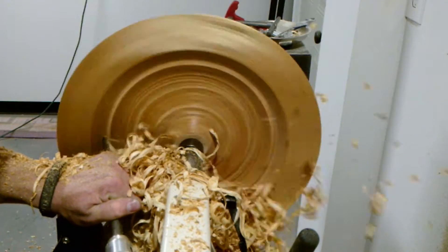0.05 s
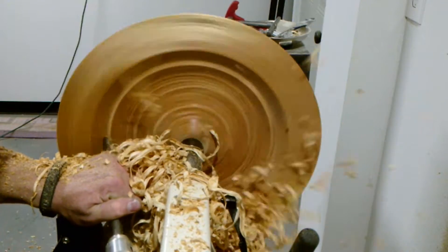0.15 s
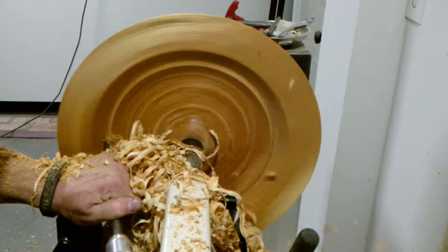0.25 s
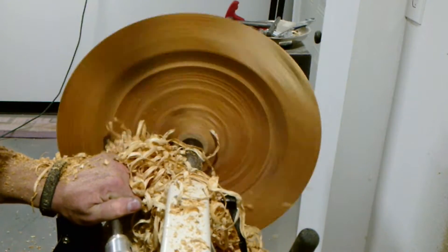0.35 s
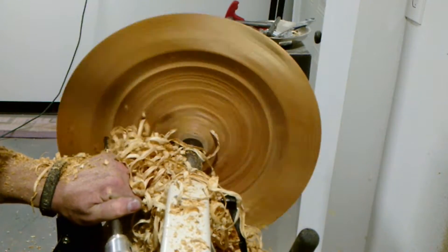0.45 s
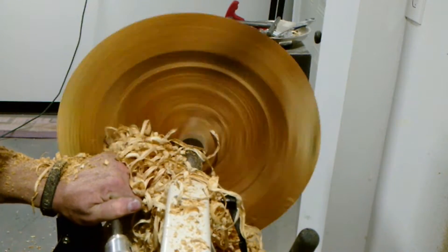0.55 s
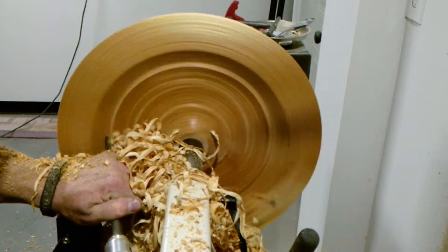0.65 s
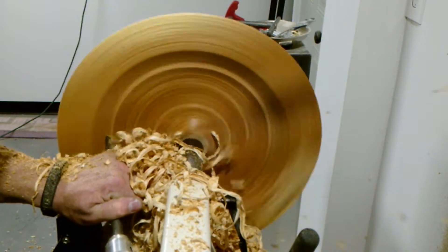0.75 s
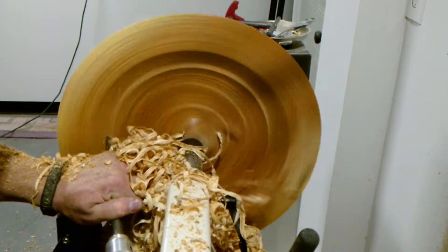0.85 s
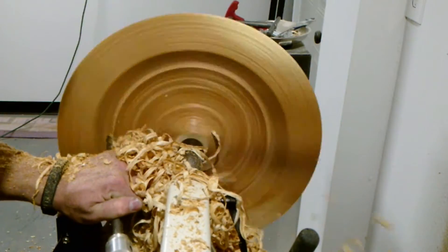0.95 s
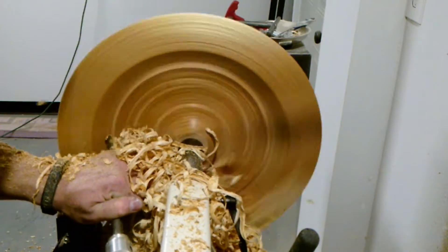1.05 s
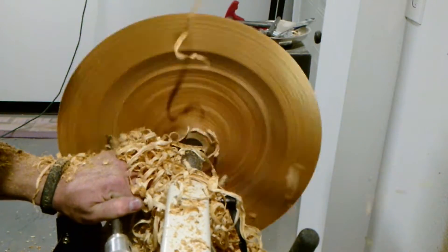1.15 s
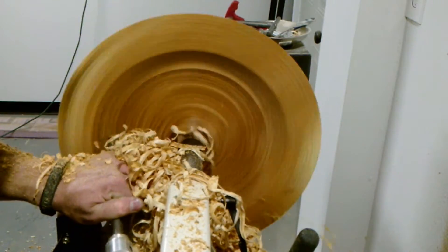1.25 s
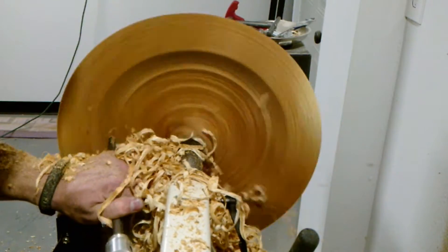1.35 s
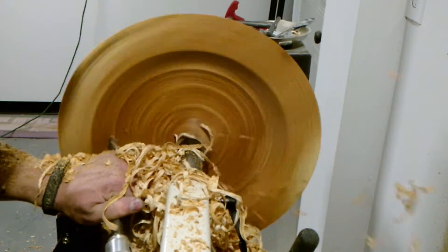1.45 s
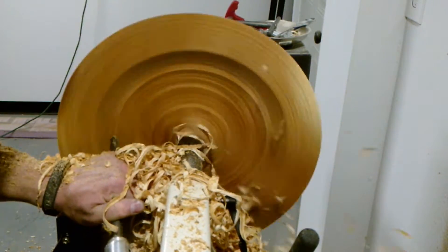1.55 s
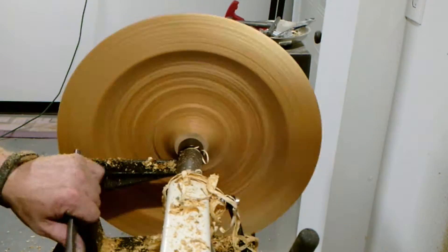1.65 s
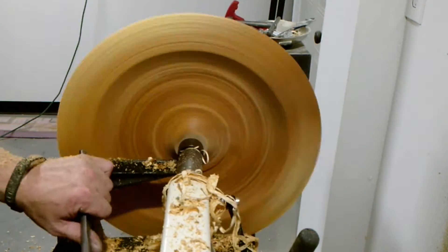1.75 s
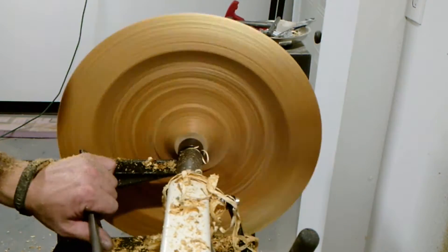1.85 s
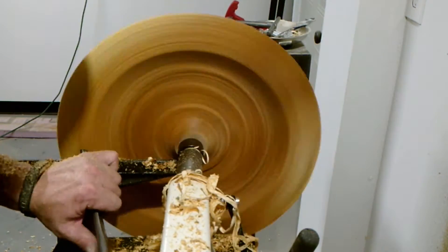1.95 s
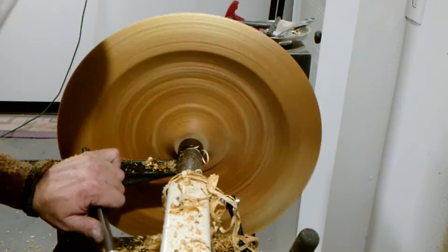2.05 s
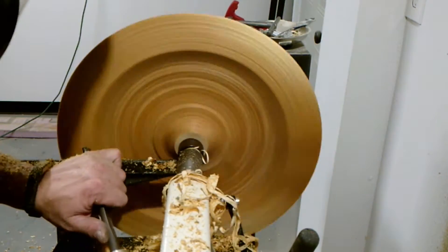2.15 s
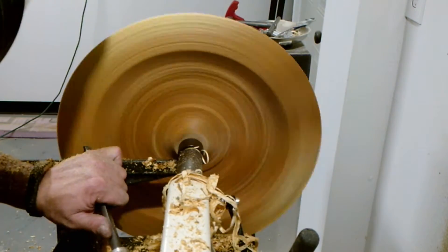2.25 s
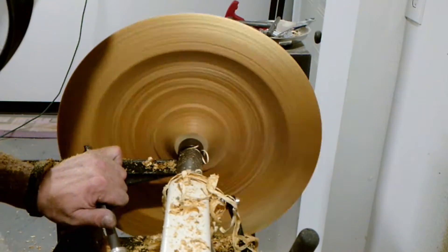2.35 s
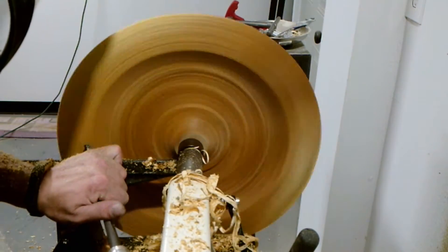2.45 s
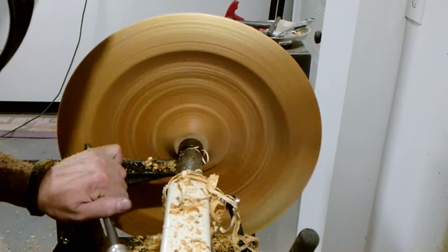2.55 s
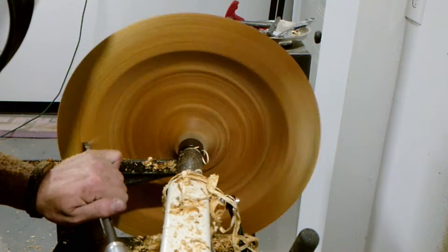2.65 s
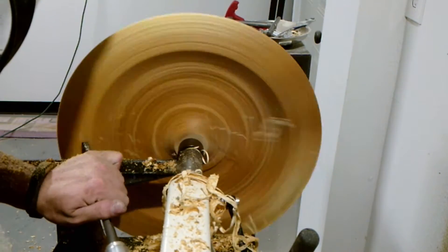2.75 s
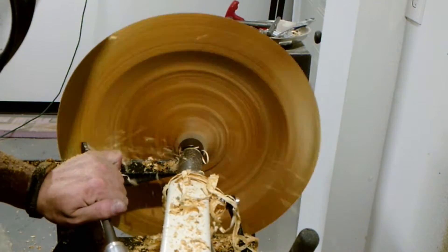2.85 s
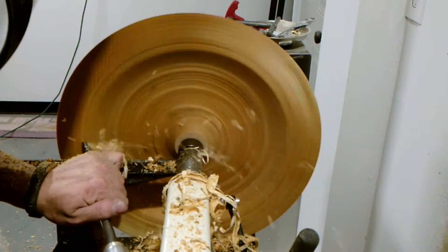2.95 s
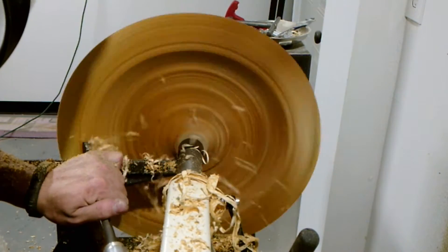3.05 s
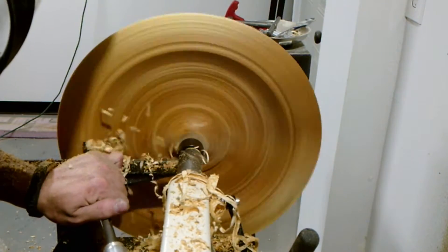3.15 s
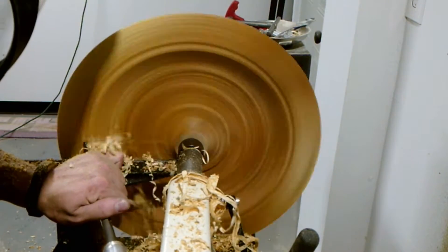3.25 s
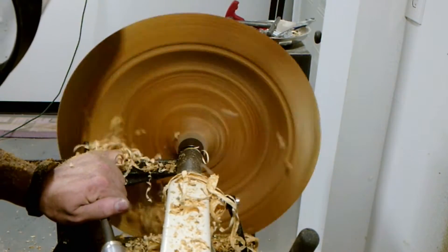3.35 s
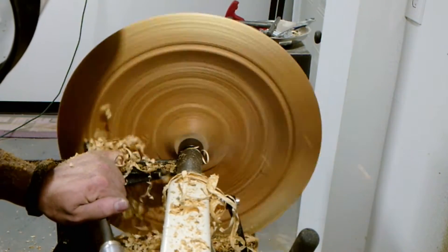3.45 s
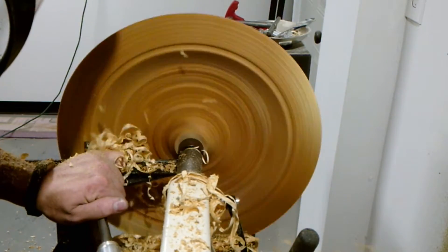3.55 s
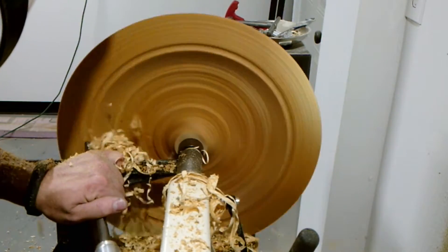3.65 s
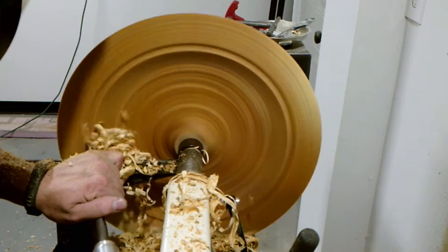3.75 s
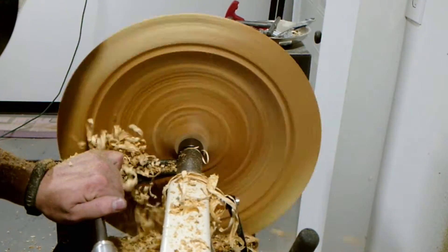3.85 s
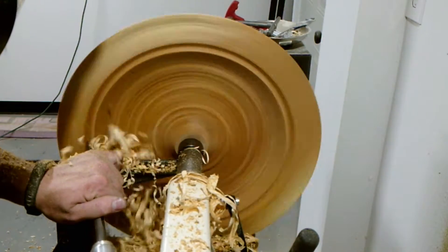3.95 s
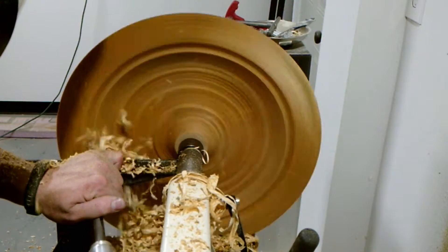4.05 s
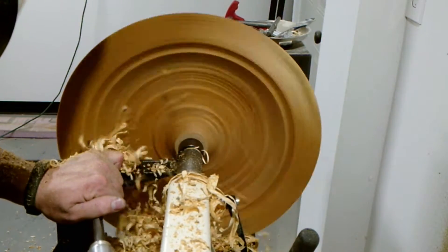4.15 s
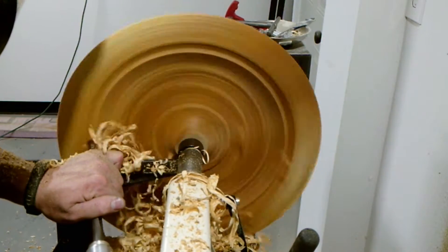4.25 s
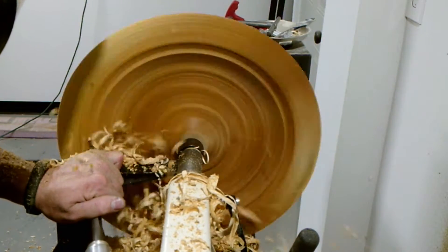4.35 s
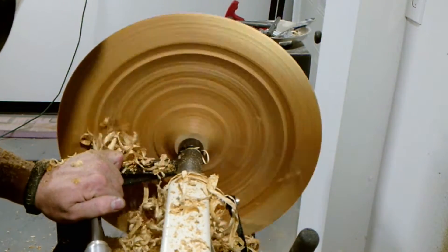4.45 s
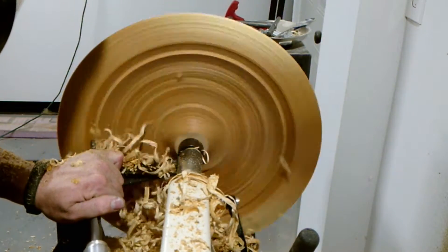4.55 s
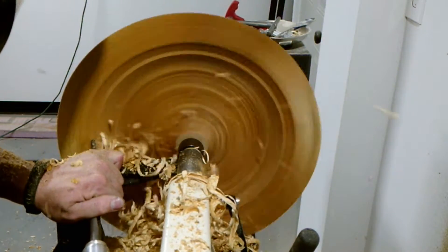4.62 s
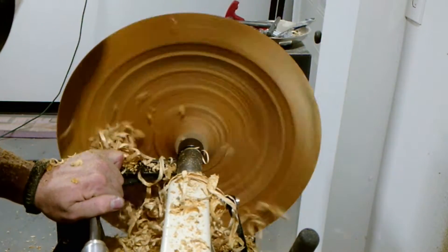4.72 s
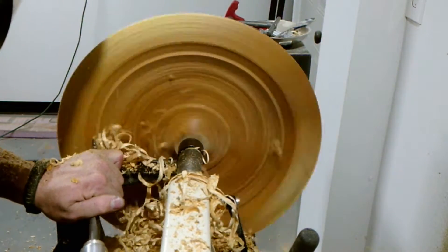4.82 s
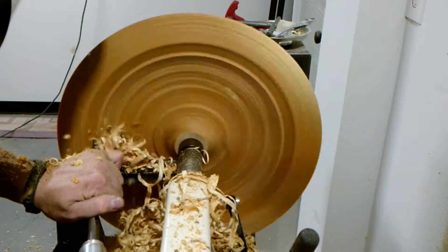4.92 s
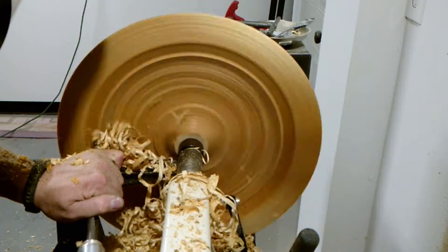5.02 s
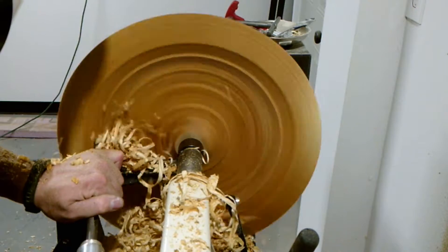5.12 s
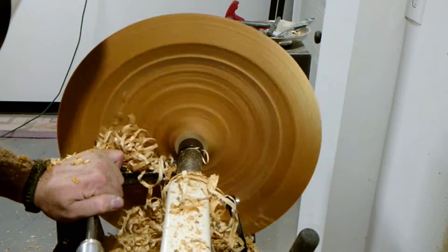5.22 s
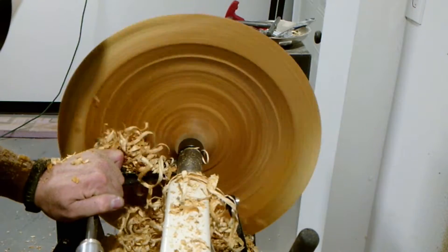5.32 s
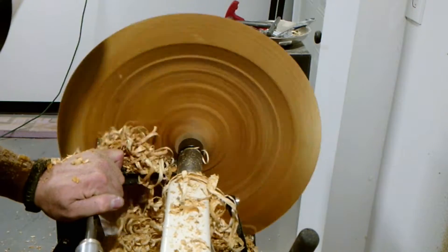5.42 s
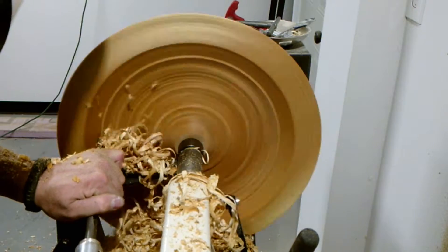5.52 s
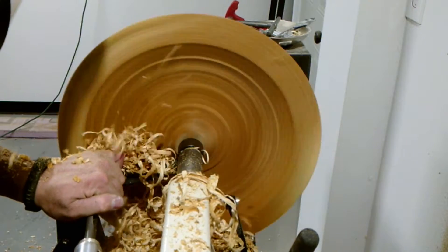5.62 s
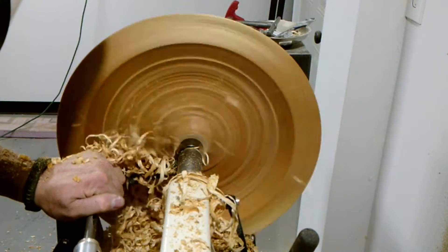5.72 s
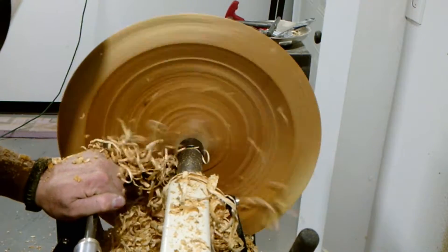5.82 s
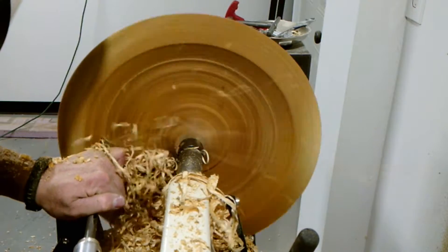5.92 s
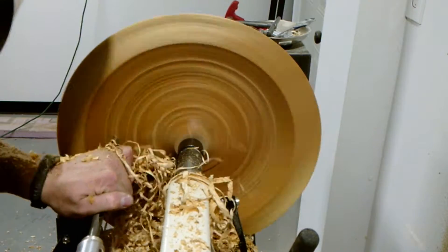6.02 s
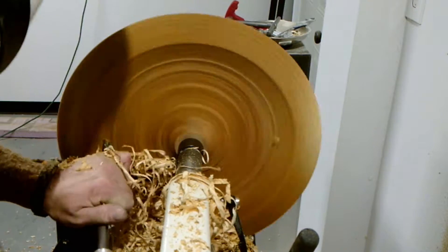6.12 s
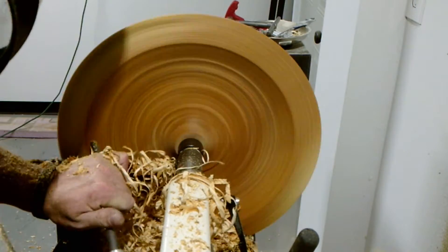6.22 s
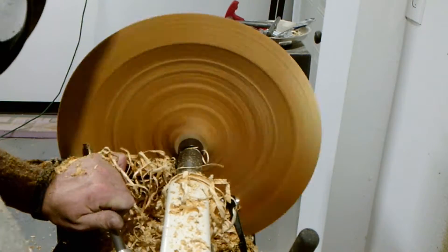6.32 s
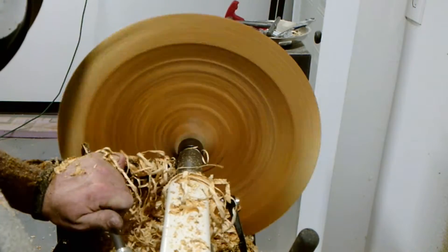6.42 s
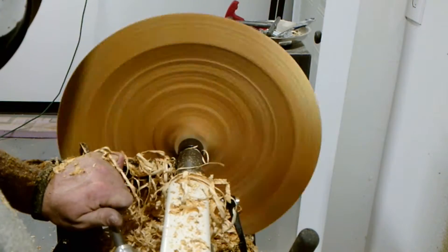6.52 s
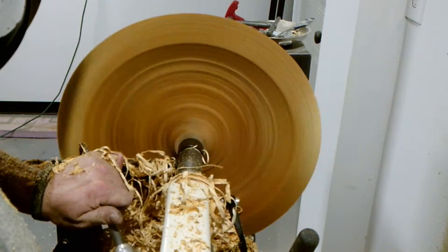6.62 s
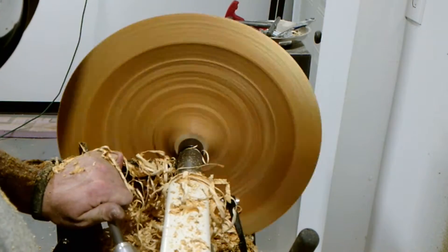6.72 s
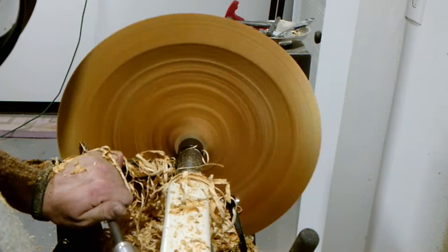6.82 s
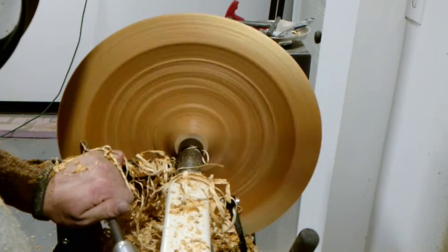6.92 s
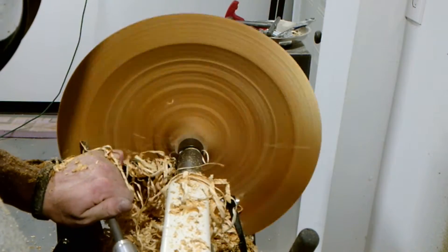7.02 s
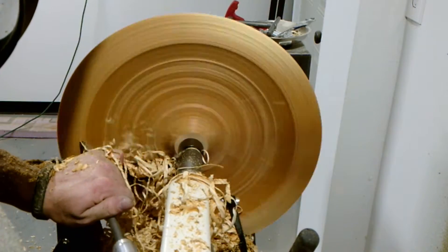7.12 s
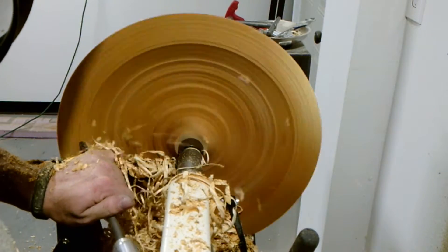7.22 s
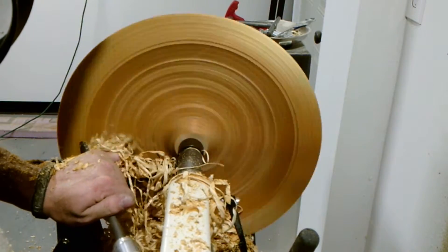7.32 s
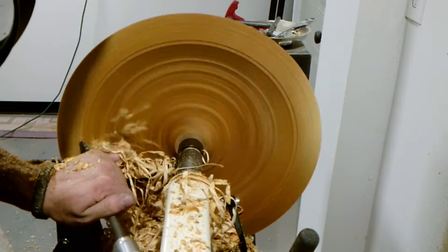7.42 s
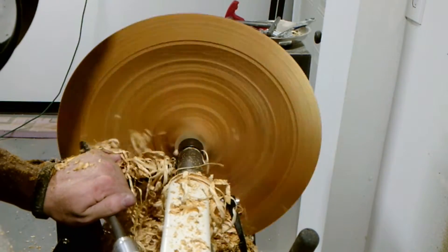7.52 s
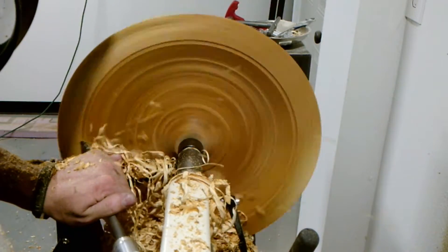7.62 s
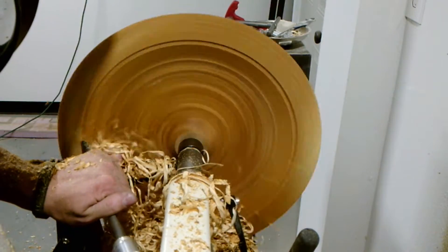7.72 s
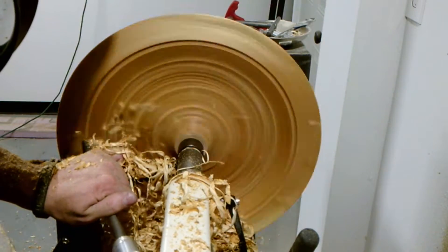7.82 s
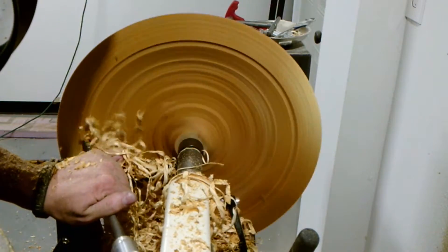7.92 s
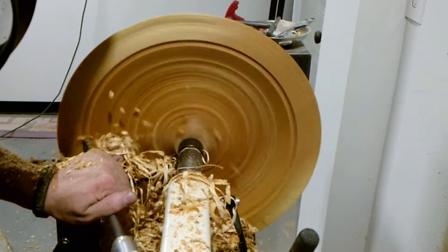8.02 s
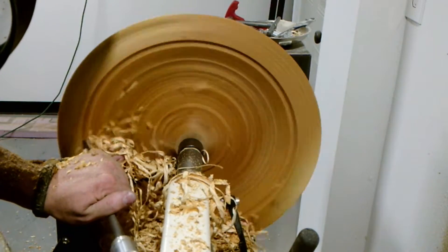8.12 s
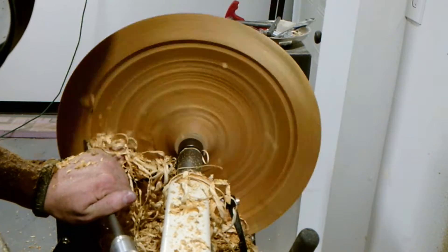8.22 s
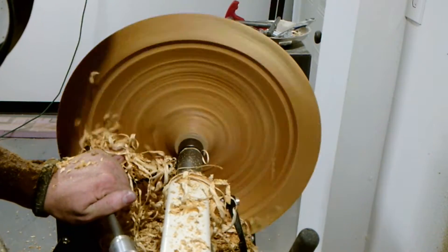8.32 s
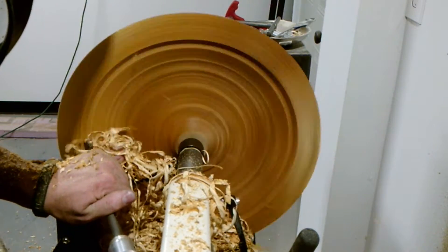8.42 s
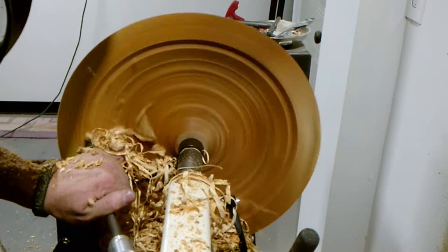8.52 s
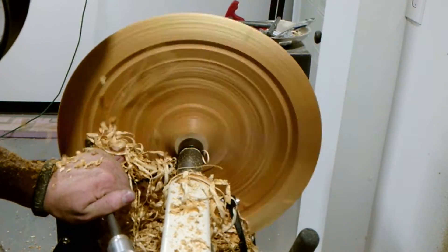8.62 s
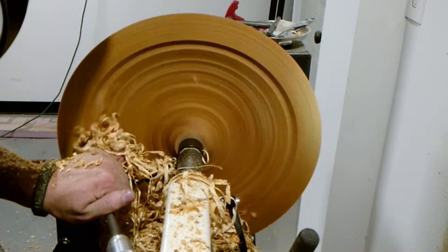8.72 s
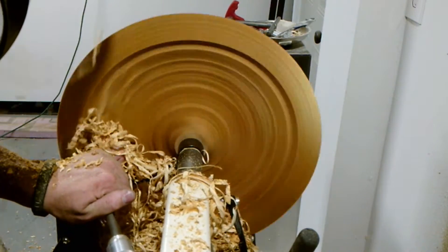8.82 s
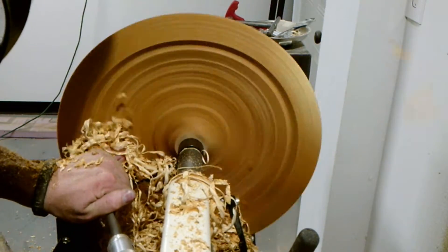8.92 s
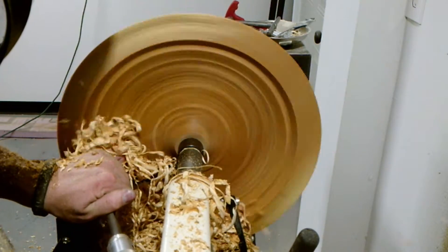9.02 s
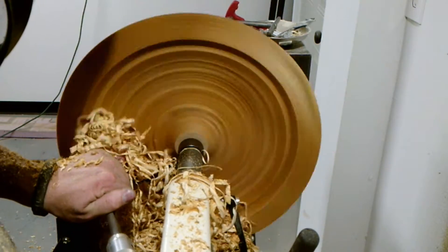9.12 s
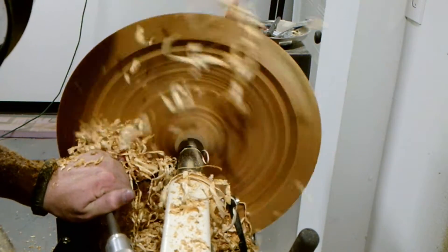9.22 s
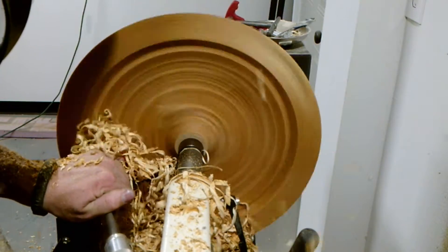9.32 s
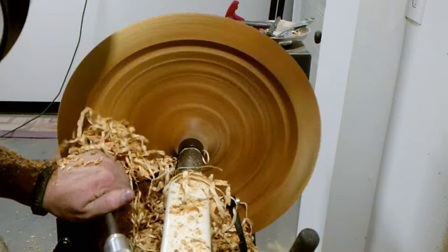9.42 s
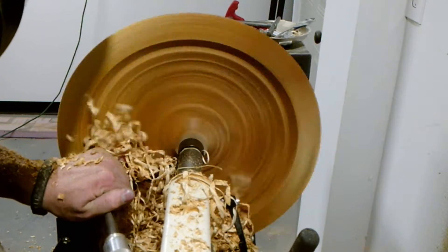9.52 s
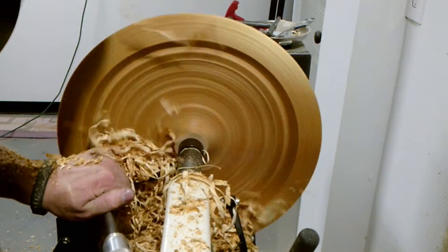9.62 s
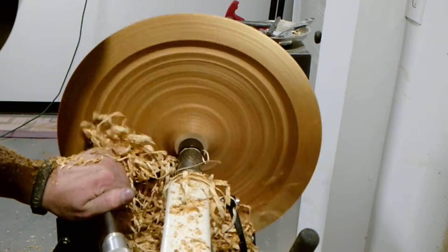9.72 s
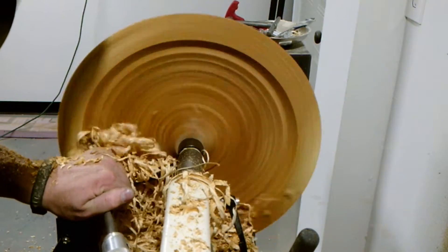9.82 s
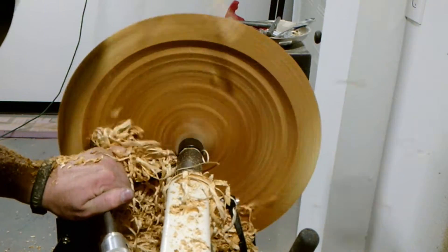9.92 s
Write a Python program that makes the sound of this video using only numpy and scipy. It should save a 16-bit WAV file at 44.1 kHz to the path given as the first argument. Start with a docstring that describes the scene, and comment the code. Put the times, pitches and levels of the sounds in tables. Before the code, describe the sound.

Close in a small workshop, a gouge tears shavings from a spinning wooden blank. Harsh, bright, metallic scraping flutters very fast with the grain and carries a thin wavering high ring. It stops, shavings rustle over the idling motor whine, a second longer pass builds and ends with a sharp tap, then after a short pause a third pass continues to the end.

```python
"""A small workshop: close by, a gouge shears shavings from a wooden bowl blank on a lathe, in three passes.
Noise from tearing fibres rings the steel tool and its rest, biting harder twice a turn on end grain, while the
edge sings as a wavering sine. Harmonics of the motor shaft whine and sag under load; filtered noise makes the
shop, a hiss and brushed shavings. A hard spot in the wood knocks once a turn in two passages; a low hum swells."""
import sys
import numpy as np
from scipy import signal
from scipy.fft import rfft, irfft
from scipy.io import wavfile
from scipy.ndimage import uniform_filter1d, map_coordinates

SR = 44100
rng = np.random.default_rng(int(sys.argv[2]) if len(sys.argv) > 2 else 0)


def transcribe(signal):
    """Save signal, clipped to [-1, 1], as a 16-bit WAV file at the path in sys.argv[1]."""
    frames = np.atleast_2d(signal).T
    limited = np.clip(frames, -1, 1)
    pcm = np.round(limited * 32767).astype(np.int16)
    wavfile.write(sys.argv[1], SR, pcm)


N = 439672

# speed of the motor shaft: (time_s, turns_per_s)
MOTOR_SPEED = [(0, 48.6), (.8, 48.8), (1.3, 49.3), (1.55, 50.5), (2.85, 50.5), (3.15, 49.6), (3.5, 48.5),
               (3.8, 47.8), (4.4, 48.3), (5.5, 49.3), (5.9, 49.8), (6.08, 50.5), (7, 50.5), (7.3, 49.6),
               (7.9, 48.4), (8.5, 48.2), (9.2, 48), (9.97, 47.7)]


def undb(db):
    """Decibels to amplitude gain."""
    return 10 ** (np.asarray(db) / 20)


def curve(rows, **ends):
    """Columns of a table after its time column, drawn as lines with one value a sample."""
    s, *columns = np.transpose(rows)
    return [np.interp(np.arange(N) / SR, s, column, **ends) for column in columns]


def unit(x):
    """Scale to an rms of 1."""
    return x / np.sqrt(np.mean(x ** 2))


def ring(x, hz, width):
    """One resonance, gain 1 at the centre; width in Hz."""
    return signal.lfilter(*signal.iirpeak(hz, hz / width, fs=SR), x)


def walk(rate):
    """Random levels held 1 / rate s and slewed twice; spread near 1."""
    hold = int(SR / rate)
    steps = np.repeat(rng.standard_normal(N // hold + 1), hold)
    return 1.24 * uniform_filter1d(uniform_filter1d(steps, hold), hold)[:N]


def swell(start, end, db, rise_db, fall_db):
    """Gain that rises to a level, holds it and falls, in dB a second."""
    t = np.arange(N) / SR
    return undb(db - rise_db * np.maximum(start - t, 0) - fall_db * np.maximum(t - end, 0))


def level_power(x):
    """Divide a gain by its own rms over a sliding quarter second, so it shares out effort and adds none."""
    return x / np.sqrt(uniform_filter1d(x ** 2, size=SR // 4))


def grip():
    """Which pass is under way, 0 to 2; the hands take a new grip in the pauses."""
    regrip_s = [2.2, 6.5]  # times of the new grips: (time_s)
    return np.searchsorted(regrip_s, np.arange(N) / SR)


def cut():
    """Effort as gain, then in dB: how light the cut is, grain bite, treble lift and the bias to one half."""
    # the hand on the tool, one list a pass; treble lifts as the tool rolls over, the two bites are shaped in grain():
    # (time_s, effort_db, end_grain_bite_db, treble_lift_db, one_half_bite_db)
    passes = [
        [(0, -20, 2.5, 2, -1), (.5, -20.5, 3.5, .5, -1), (.9, -19, 3.5, 0, -0.5), (1.15, -20, 4, -1.5, -1),
         (1.3, -21, 5, -0.5, -2), (1.4, -22, 5, -3, -1.5), (1.47, -29, 5, -3, -1.5), (1.6, -57, 8, 0, -1)],
        [(2.69, -61, 2, 0, 1), (2.72, -41, 2, -2, 3), (2.78, -39, 2.5, -2, 2), (2.85, -30, 2, 0, 1),
         (3, -26.5, 1.5, 1, 3.5), (3.15, -24.5, 1.5, 1.5, 3.5), (3.4, -21.5, 1.5, 4.5, 1.5),
         (4, -19.5, 2.5, 6, -0.5), (4.5, -19, 2, 2, -1), (4.95, -17.5, 2.5, -2.5, -0.5), (5.4, -20, 2, -4, -1),
         (5.955, -19, 2.5, -5, -1), (5.99, -30, 2.5, -6, -0.5), (6.08, -64, 0, -6, 1)],
        [(6.97, -57, 1, 0, 1.5), (7.05, -29, 2, -1, 3), (7.13, -26.5, 2, 1.5, 2), (7.25, -24.5, 2.5, 1.5, 3),
         (7.5, -19.5, 3, 2, 1.5), (7.9, -18, 3, 2, -1), (8.4, -17, 3, -1, -1), (8.8, -18.5, 3.5, -0.5, -1.5),
         (9.4, -20, 2.5, -1, -0.5), (9.97, -19.5, 3, -2.5, -1)],
    ]
    full_cut_db, light_span_db = -19, 12  # a cut counts as lighter below this effort, by at most this span
    effort = sum(undb(curve(rows, left=-150., right=-150.)[0]) for rows in passes)
    effort_db, *controls = curve(np.vstack(passes))
    return effort, np.clip(full_cut_db - effort_db, 0, light_span_db), *controls


def turns():
    """Angle of the blank against the edge, counted in turns; the belt ties it to the motor."""
    # where the edge stands against the grain, one row a pass: (time_s, blank_angle_turns)
    setting = [(.75, .58), (4.5, .18), (8.5, .775)]
    belt_ratio = 2.524  # turns of the motor to one turn of the blank
    spun = np.cumsum(curve(MOTOR_SPEED)[0]) / SR / belt_ratio
    offset = np.array([angle - spun[int(s * SR)] for s, angle in setting])
    return spun + offset[grip()]


def grain():
    """Bite of the edge in dB: it catches on meeting end grain, twice a turn, then eases;
    one half of the turn bites harder, and which half changes with the cut."""
    half_offset_turns = .5
    _, _, bite_db, _, round_db = cut()
    turn = turns()
    side = 2 * np.pi * (turn - half_offset_turns) + 0.24
    half = 4 * np.pi * turn + 0.71
    catch = uniform_filter1d(np.exp(-((2 * turn - .75) % 1) / 0.1), size=70)
    twice_a_turn = np.cos(half) + 0.36 * np.cos(2 * half + 2.22) + .95 * catch
    once_a_turn = np.cos(side) + 0.26 * np.cos(2 * side + .8) + 0.16 * np.cos(3 * side + 1.4)
    return 1.36 * (bite_db * twice_a_turn + round_db * once_a_turn)


def touches():
    """Short scrapes with a sudden start as tool and rest meet or part: gains for low, middle and high ranges."""
    # the tool touches, leaves or taps the rest:
    # (time_s, peak_db, decay_to_minus_60_db_s, low_range_lift_db, high_range_lift_db)
    contacts = [(2.696, -32, .03, -1, 2), (2.702, -24, 0.04, -1, 2), (2.832, -33, .05, -1, 1),
                (5.998, -12, 0.045, -5, -9), (6.0494, -37, 0.1, 10, -4), (6.348, -37, .07, 10, 0.5),
                (6.977, -34, .03, -6, 6), (6.985, -30, 0.08, -6, 6)]
    out, t = np.zeros((3, N)), np.arange(N) / SR
    for s, db, t60, low_db, high_db in contacts:
        fade_s = np.where(t < s, .004, t60)
        envelope = undb(db - 60 * np.abs(t - s) / fade_s)
        out += undb([[low_db], [0], [high_db]]) * envelope
    return out


def chatter(bite_db):
    """The flute of the gouge drives itself into song while the edge is biting; its pitch wavers a little."""
    song_hz = 4247
    gate = level_power(undb(2.43 * uniform_filter1d(bite_db, size=130) + 1.5 * walk(11)))
    phase = 2 * np.pi * np.cumsum(song_hz + 32 * walk(90)) / SR
    return np.sqrt(2) * gate * np.sin(phase)


def gouge():
    """Dense fibre breaks of uneven size excite every ring of the tool, its rest and the blank."""
    # resonances of tool, rest and blank, one list for each range, main range first; levels are a balance
    # within the range: (centre_hz, width_hz, pass_1_db, pass_2_db, pass_3_db)
    ring_bank = [
        [(3498, 60, -6, -11, -11), (3634, 47, -10, -10, -10), (3865, 30, -3, -30, -18),
         (4204, 35, -4, -18, -9.5), (4246, 25, 0, 0.5, -0.5), (4400, 87, -20, -11.5, -18.5),
         (4860, 40, -25, -26, -27), (4953, 36, -7, -8, -9.5), (5220, 67, -24, -12.5, -13),
         (5524, 115, -28, -17, -14), (4040, 1880, -11, -12.5, -14.5)],
        [(487.5, 20, 0, 2, 0), (618, 490, 0, -7, 0)],
        [(986, 56, 2, 4, -2), (1070.5, 21, -2, 1, 3.5), (1118, 340, -5, -4, -3)],
        [(1775, 136, -6, -15.5, -28), (1903.5, 32, -3.5, 0, -1), (2026, 36, -7, -6.5, -5.5),
         (2242, 67, -18, -4.5, -4), (2332, 120, -24, -5, -7), (2556, 30, -15, -1.5, 0.5),
         (2728, 29, 1.5, 0.5, -2), (2206, 1360, -13, -6.5, -7.5)],
        [(6460, 50, 0, -1, -25), (6545, 80, -2, -26, -31), (6620, 33, -22, -9, -5), (6766, 48, -7, 2.5, 0.5),
         (6632, 890, 0, -1, -3.5)],
        [(7676, 67, 0, -7, -7.5), (8160, 50, -13, -4.5, -11), (8264, 90, -14, 0, -4), (8600, 55, -23, -25, -23),
         (8700, 50, -25, -12, -21), (9140, 42, -7, -9, -6), (9460, 58, 1, -8, -1), (9530, 78, -15, -10, -1.5),
         (9840, 56, -10, -25, -9), (8790, 2250, -8, -3, -9.5)],
        [(10230, 104, -0.5, -10.5, -11), (10400, 210, -8, -6, -9), (10600, 54, -10, 1, 0),
         (10820, 91, -25, -7, -6), (11250, 70, -9, -7.5, 0), (11600, 65, -7, -24, -1),
         (10940, 1530, -11, -14.5, -4)],
        [(12200, 100, -3, -28, -25), (12900, 130, -20, -12, -8), (14000, 320, -23, -7, -9),
         (12380, 1900, 0, -2, -2)],
    ]
    # level of each range against the main range, treble_lift_share as a factor, light_gain per dB of lighter cut:
    # (pass_1_db, pass_2_db, pass_3_db, treble_lift_share, light_gain_db)
    shares = [(0, 0, 0, 0.074, 0.019), (-26, -32.5, -30, 0.19, .01), (-12.5, -18, -18, -0.14, 0.11),
              (-6.5, -9, -8, .3, 0), (-1.5, -2.5, -3, -0.23, 0), (-3, 1.5, 1.5, 0.48, 0.063),
              (-1.5, -3, -6, 1.01, .01), (-8, -6.5, -7, .3, 0.33)]
    # how strongly each range follows the grain: (factor)
    grain_share = [0.75, 0.66, 0.18, 0.48, 0.77, 1.01, 1.08, 0.77]
    # borders between the low, middle and high ranges: (edge_hz)
    range_edges_hz = [3000, 7500]
    # song of the edge against the effort: (level_db), one for each pass
    chatter_db = [-11.5, -7.5, -5]
    chatter_light = -.3  # the song weakens in a light cut, dB a dB
    tick_db = -3  # the dry tick of a touch, before its filter
    crowd_hz = 200  # a ring wider than this is a crowd of close modes with steep flanks

    effort, light_db, _, lift_db, _ = cut()
    now = grip()
    breaks = unit(rng.standard_normal(N) * undb(1.39 * rng.exponential(size=N)))
    bite_db = grain() + .5 * walk(14) + 0.78 * walk(150)
    taps = touches()

    song_drive = effort * undb(chatter_light * light_db) + taps[1]
    out = song_drive * undb(chatter_db)[now] * chatter(bite_db)
    out = out + undb(tick_db) * taps[0] * ring(breaks, 4000, 6500)

    for rings, (*share_db, lifts, lightens), follow in zip(ring_bank, shares, grain_share):
        bite = level_power(undb(follow * bite_db + 0.42 * walk(25)))
        tone = undb(lifts * lift_db + lightens * light_db)
        tap = taps[np.searchsorted(range_edges_hz, rings[-1][0])]
        push = undb(share_db)[now] * (effort * bite * tone + tap)
        # power that the whole range passes from white noise, one value a pass
        power = sum(undb(db) ** 2 * width * np.pi / SR / (1 + (width > crowd_hz)) for _, width, *db in rings)
        for hz, width, *db in rings:
            ring_gain = (undb(db) / np.sqrt(power))[now]
            # each ring is shaken from its own stretch of the edge
            own_breaks = np.roll(breaks, rng.integers(N))
            rung = ring(push * ring_gain * own_breaks, hz, width)
            out = out + (ring(rung, hz, width) if width > crowd_hz else rung)
    return out


def room(x, t60, treble_t60, wet_db):
    """A decaying cloud of reflections behind the direct sound; the treble dies first."""
    t = np.arange(SR // 2) / SR
    noise = rng.standard_normal(len(t))
    low = signal.sosfilt(signal.butter(2, 6000, fs=SR, output="sos"), noise)
    tail = low * undb(-60 * t / t60) + (noise - low) * undb(-60 * t / treble_t60)
    tail = tail * (t > .004)  # reflections start after 4 ms
    return x + undb(wet_db) * signal.fftconvolve(x, tail / np.sqrt(np.sum(tail ** 2)))[:N]


def motor():
    """Multiples of the shaft rate slide through the housing resonances as the load changes."""
    # whine before housing and load lift it: (shaft_multiple, level_db_rms)
    whine = [(22, -56), (23, -65.5), (24, -74.5), (25, -61), (26, -59), (27, -65.5), (29, -57), (30, -57),
             (33, -67), (34, -57), (43, -59)]
    # housing resonances, each adding its gain to the plain whine: (centre_hz, width_hz, gain_db)
    housing = [(1311, 18, 18.5), (1251, 13.5, 10), (1194, 26, 21)]
    load_db_per_hz = 1  # the whine grows as the shaft slows under load
    shaft_hz, out = curve(MOTOR_SPEED)[0], 0
    angle = 2 * np.pi * np.cumsum(shaft_hz) / SR
    load_db = load_db_per_hz * (shaft_hz.max() - shaft_hz)
    for multiple, db in whine:
        lift = 1
        for hz, width, top_db in housing:
            lift = lift + undb(top_db) / (1 + (2 * (multiple * shaft_hz - hz) / width) ** 2)
        level = np.sqrt(2) * undb(db + load_db + 1.4 * walk(14))
        out = out + level * lift * np.sin(multiple * angle + 2 * np.pi * rng.random())
    return out


def idle_noise():
    """Belt and bearing noise, coloured in the spectrum and flickering in level, with a few rattling panels."""
    # colour of the idling lathe and shop, relative: (frequency_hz, density_db)
    spectrum = [(18, -45), (30, -14), (355, -27), (612, -27), (794, -20.5), (953, -14.5), (1300, -18),
                (1410, -16), (1520, -8.5), (3230, -22), (8000, -29.5), (12500, -30), (15000, -35)]
    # narrow panel resonances: (centre_hz, width_hz, level_db_rms)
    rattle = [(610, 42, -61), (970.5, 9, -51.5), (1072, 18, -53), (1189, 21, -50.5), (1960, 24, -62)]
    shop_db = -46  # rms
    hz, db = np.transpose(spectrum)
    bins_hz = np.fft.rfftfreq(N, 1 / SR)
    colour = undb(np.interp(np.log(bins_hz + 1), np.log(hz), db))
    noise = rng.standard_normal(N) * undb(1.5 * walk(60))
    out = undb(shop_db) * unit(irfft(rfft(noise) * colour, N))
    for hz, width, db in rattle:
        out += undb(db) * unit(ring(rng.standard_normal(N), hz, width))
    return out


def hiss():
    """A thin treble hiss of twice-filtered noise under the idling lathe, silent in most of the first pause."""
    stretches = [(0, 1.8, -58), (3, 9.97, -59)]  # when it is heard: (start_s, end_s, level_db_rms)
    hz, width_hz = 11000, 7000
    noise = ring(ring(rng.standard_normal(N), hz, width_hz), hz, width_hz)
    return sum(swell(*row, 300, 300) for row in stretches) * unit(noise)


def rustle():
    """Shavings are brushed away: noise of uneven crumbs through two broad resonances."""
    levels = [(1.6, -48), (1.72, -45.5), (2.1, -47.5), (2.4, -55), (2.7, -68)]  # loudness of the brushing: (time_s, level_db_rms)
    crumbs = rng.standard_normal(N) * undb(2.5 * rng.exponential(size=N))
    level = undb(curve(levels, left=-150., right=-150.)[0])
    return level * unit(ring(ring(crumbs, 2800, 3000), 3200, 6000))


def hum():
    """A faint low sine swells and fades."""
    # the swells: (top_s, level_db_rms, rise_db_per_s, fall_db_per_s)
    swells = [(1.87, -55.5, 50, 47), (2.28, -58, 90, 200), (2.46, -67, 150, 60)]
    hum_hz = 290
    level = sum(swell(s, s, *shape) for s, *shape in swells)
    return np.sqrt(2) * level * np.sin(2 * np.pi * hum_hz * np.arange(N) / SR)


def knot():
    """A hard spot in the wood knocks at one angle of the blank and rings a low mode of the tool rest."""
    # passages with the knock: (start_s, end_s, level_db_rms)
    passages = [(4.2, 5.1, -31.5), (9.1, 9.8, -33.5)]
    mode_hz, width_hz, fade_db_s = 2263, 280, 50
    shake = np.sin(2 * np.pi * mode_hz * np.arange(N) / SR + 3 * walk(40))
    shake = shake + .8 * rng.standard_normal(N)
    scrape = np.exp(-((turns() - .42) % 1) / .05) * shake  # a sudden start once a turn
    level = sum(swell(*row, fade_db_s, fade_db_s) for row in passages)
    return level * unit(ring(scrape, mode_hz, width_hz))


def scene():
    """The tool in its room, then the knocks, the motor and the shop, in one channel."""
    wander_s = .0002  # the rings drift a little in pitch as the grip flexes
    tool = map_coordinates(gouge(), [np.arange(N) + wander_s * SR * walk(12)], mode="mirror")
    tool = room(tool, t60=0.3, treble_t60=.22, wet_db=-6)
    shop = idle_noise() + hiss() + rustle() + hum()
    return (tool + knot() + motor() + shop)[None]


def record(dry):
    """The microphone dulls the very top and its amplifier rounds the loudest bites, which adds low thumps;
    the level dips briefly once; the top is cut."""
    gap_s = (1.666, 1.6995)  # the dip: (start_s, end_s)
    mic_hz, top_hz = 14100, 15120
    t = np.arange(N) / SR
    heard = signal.sosfilt(signal.butter(2, mic_hz, fs=SR, output="sos"), dry)
    knee = np.where(heard > 0, .42, .5)  # the two swings give way at different heights
    over = np.maximum(np.abs(heard) - knee, 0)
    rounded = heard - np.sign(heard) * (over - 0.35 * np.tanh(over / 0.45))
    rounded = rounded * np.where((t > gap_s[0]) & (t < gap_s[1]), undb(-38), 1)
    rounded = signal.sosfilt(signal.butter(1, 30, "high", fs=SR, output="sos"), rounded)  # coupling capacitor
    return signal.sosfilt(signal.ellip(12, .3, 95, top_hz, fs=SR, output="sos"), rounded)


dry = scene()
out = record(dry)
transcribe(out)
```